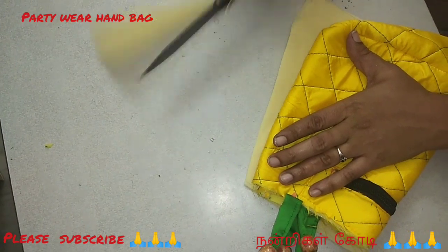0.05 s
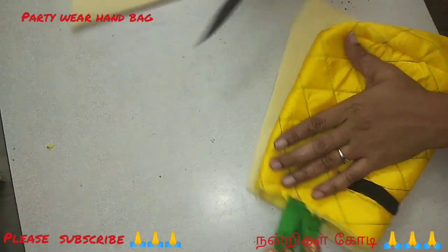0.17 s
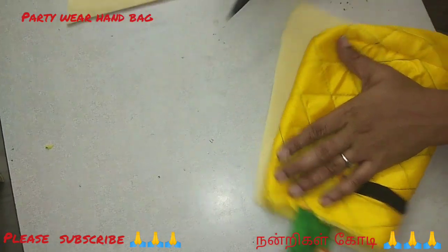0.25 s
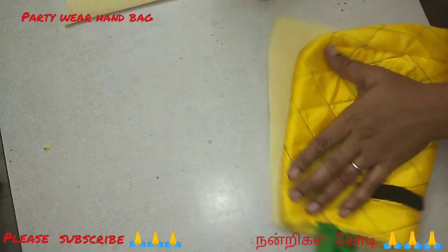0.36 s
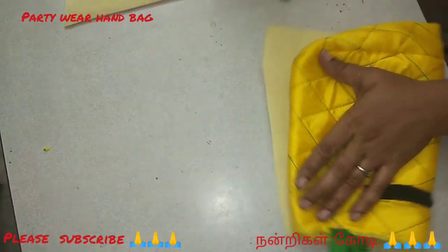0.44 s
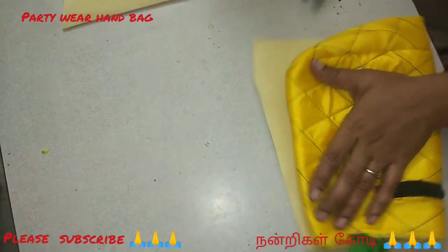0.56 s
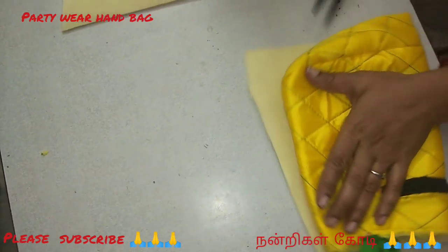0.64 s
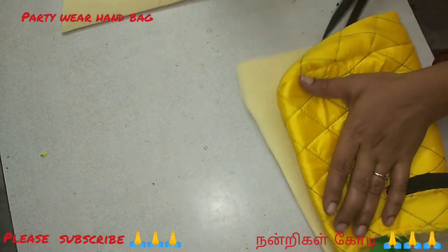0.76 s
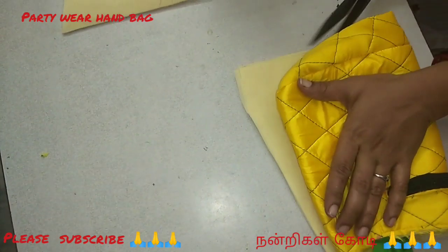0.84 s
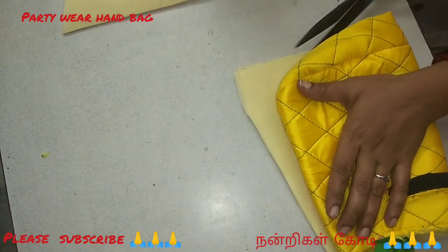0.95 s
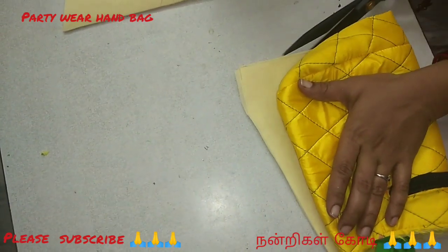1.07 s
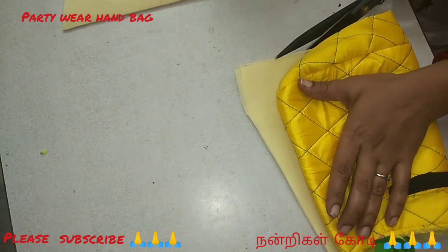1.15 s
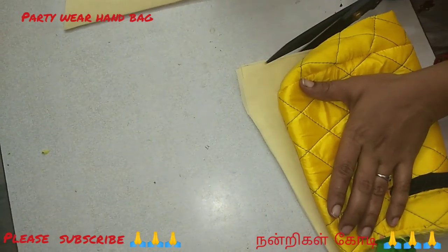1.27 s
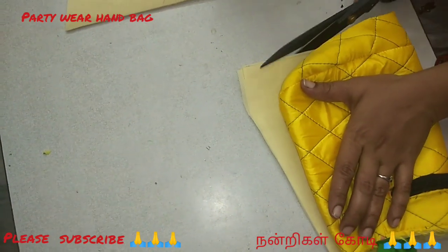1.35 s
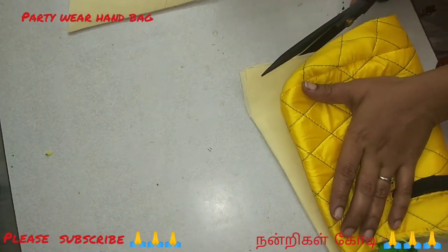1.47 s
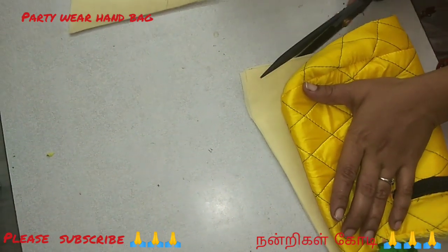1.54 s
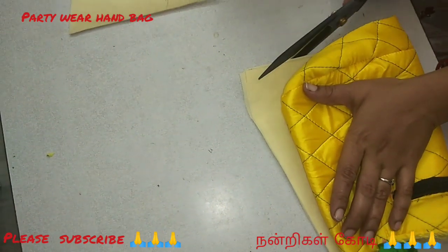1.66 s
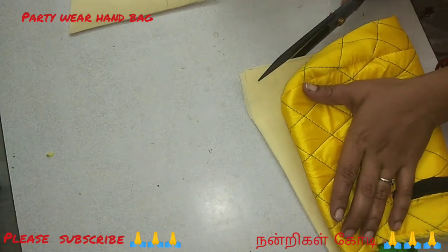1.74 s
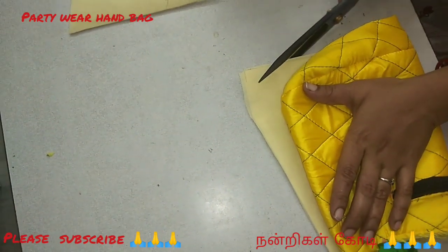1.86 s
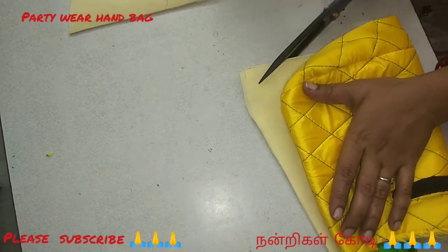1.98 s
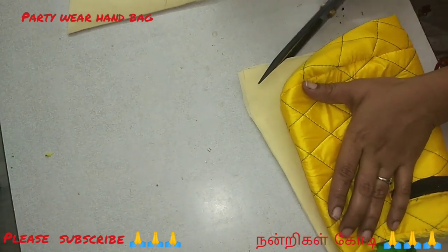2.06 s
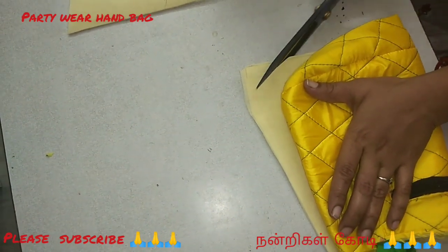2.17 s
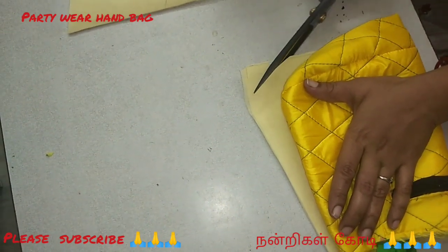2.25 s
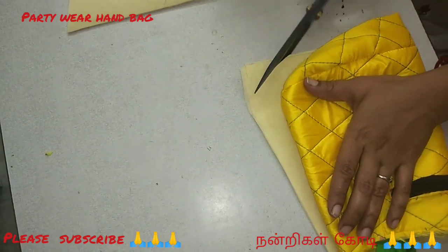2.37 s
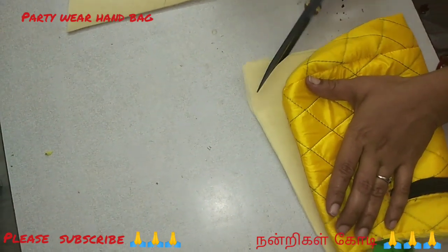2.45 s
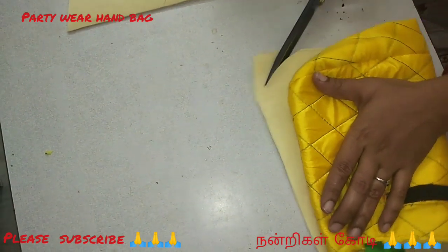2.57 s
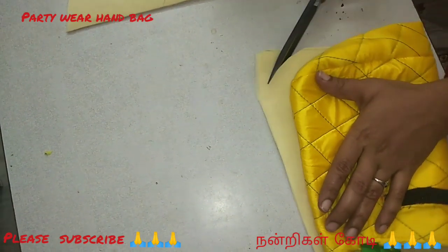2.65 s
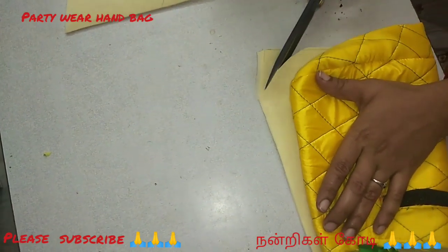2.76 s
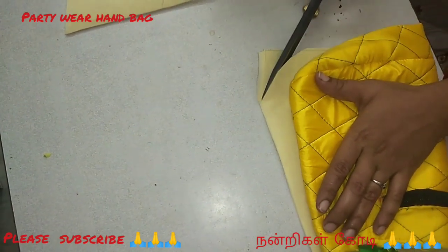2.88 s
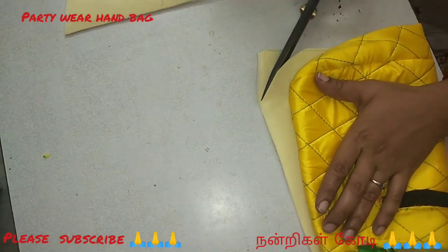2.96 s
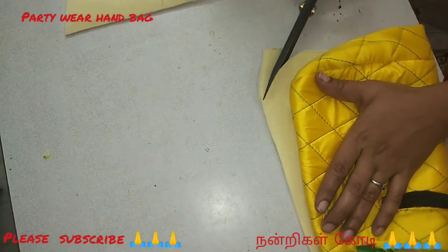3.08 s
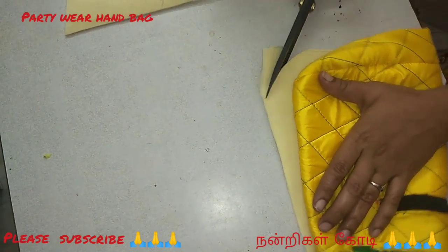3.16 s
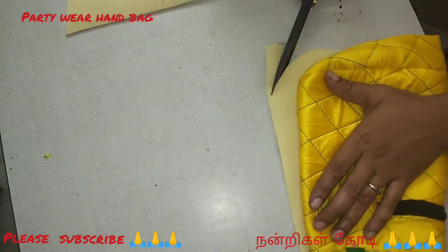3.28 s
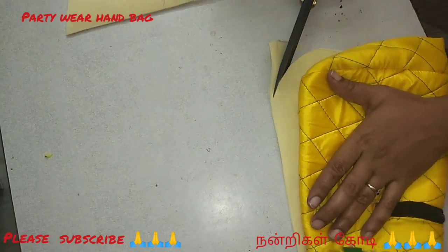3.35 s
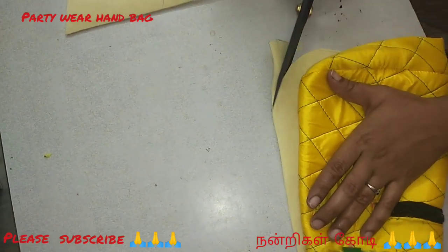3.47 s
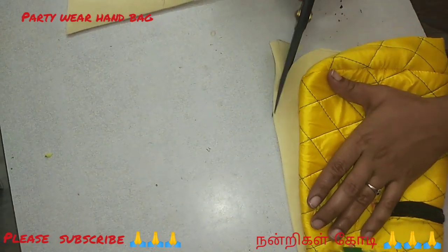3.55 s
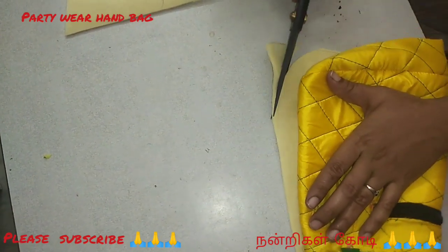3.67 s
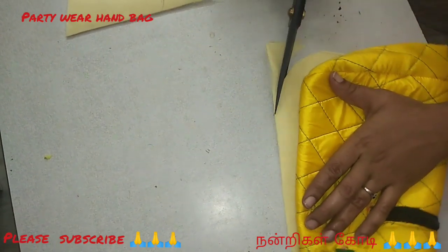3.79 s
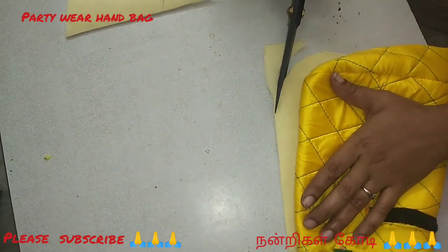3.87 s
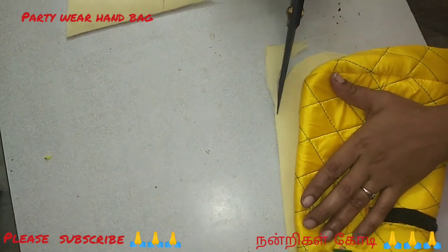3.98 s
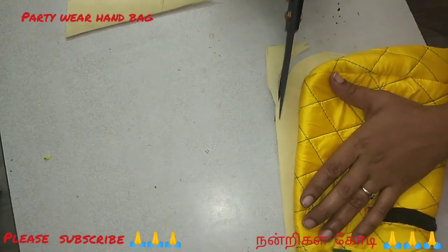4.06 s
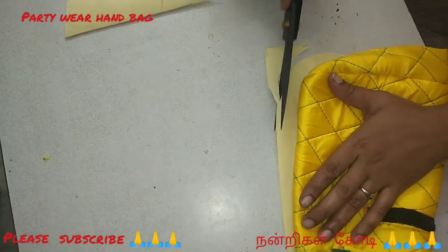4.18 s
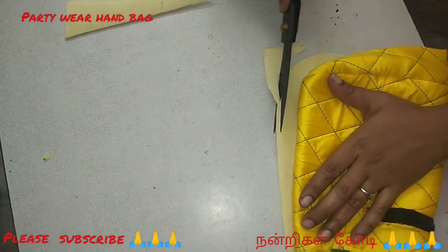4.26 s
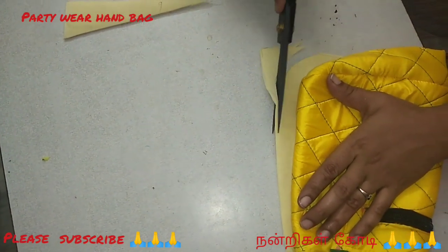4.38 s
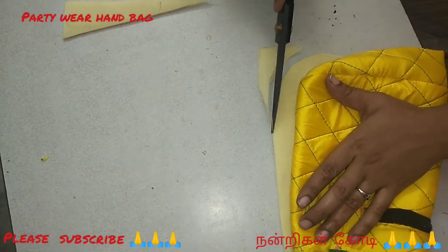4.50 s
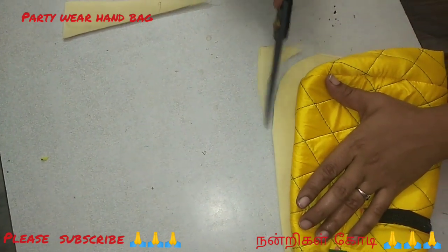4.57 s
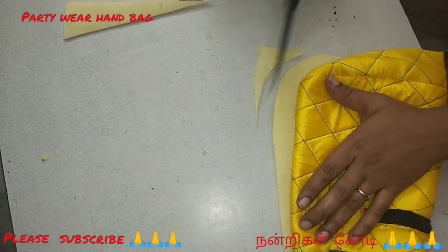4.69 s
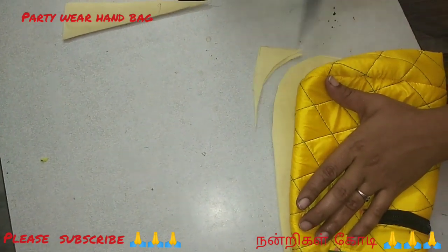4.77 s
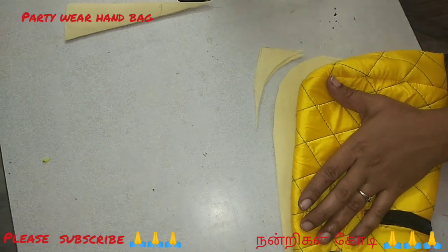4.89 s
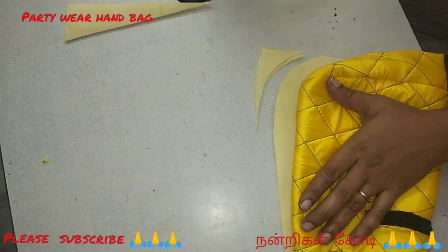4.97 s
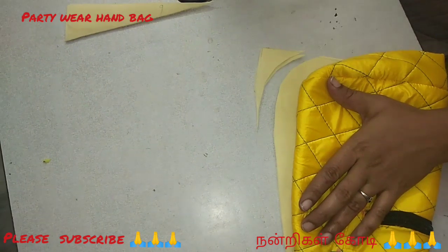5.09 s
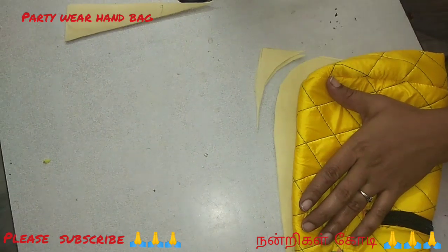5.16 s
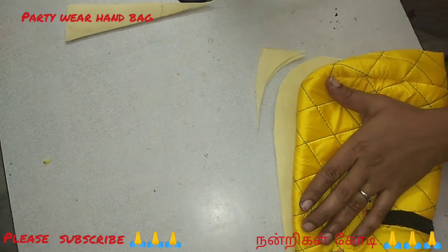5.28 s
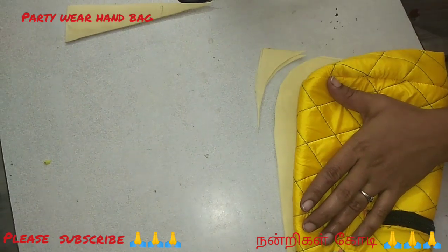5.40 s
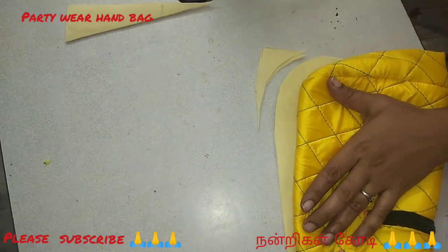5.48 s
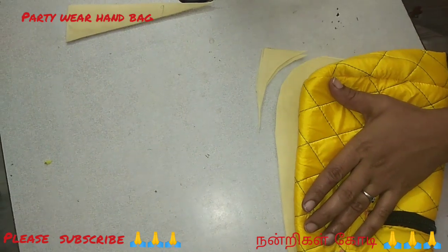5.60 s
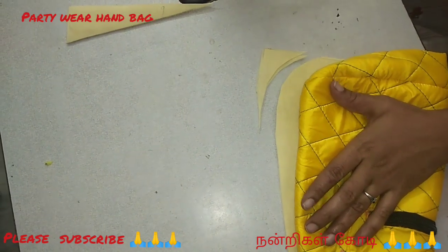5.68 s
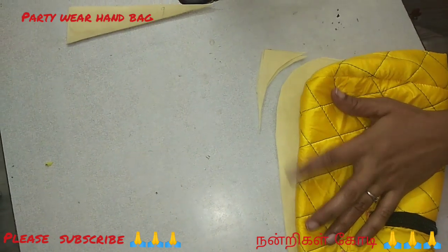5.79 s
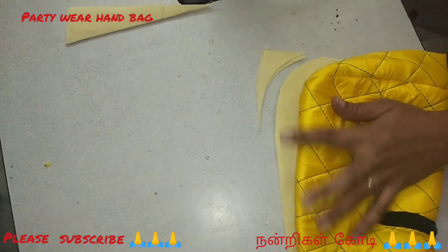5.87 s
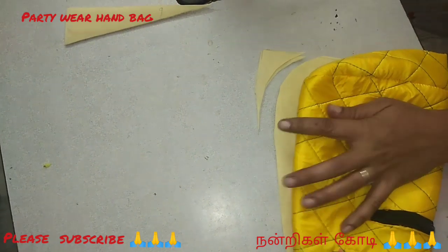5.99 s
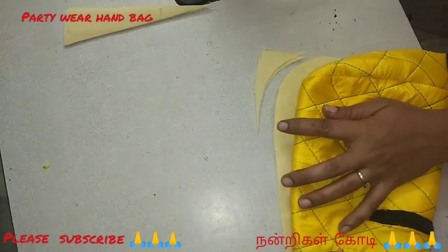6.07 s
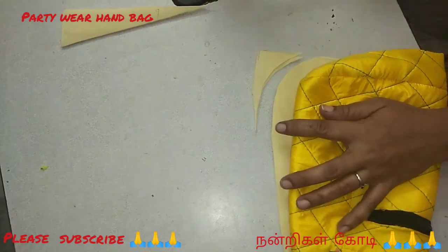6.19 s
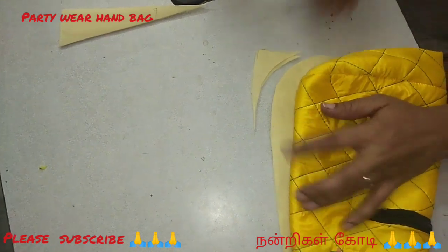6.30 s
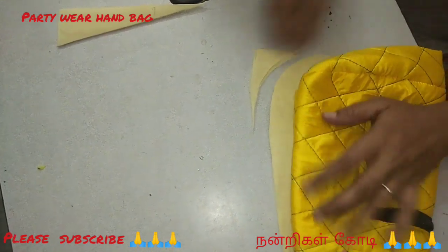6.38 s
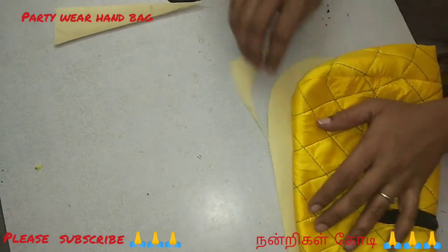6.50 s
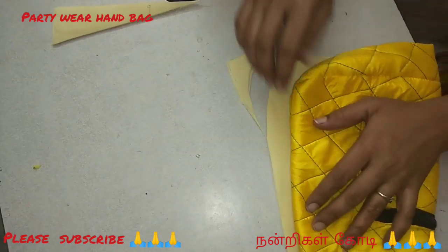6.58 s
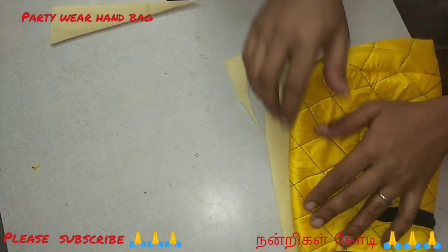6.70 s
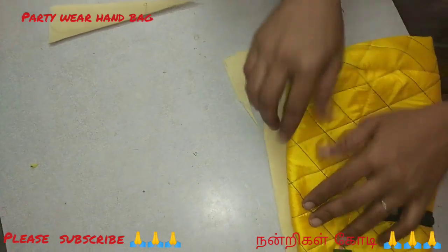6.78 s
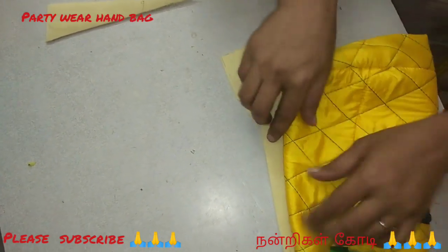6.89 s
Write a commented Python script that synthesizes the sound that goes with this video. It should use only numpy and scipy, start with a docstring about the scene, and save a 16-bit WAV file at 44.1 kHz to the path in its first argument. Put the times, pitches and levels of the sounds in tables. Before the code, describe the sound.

Close mono pickup in a small room with dull air and a faint wavering hum. Handles tap and steel scrapes on a hard table while cloth brushes softly. Heavy scissors then rasp through fabric in spaced strokes, the last ending in a metallic clack. After a pause they are laid down with a quick judder, taps and a hard knock, followed by cloth rustle and a crinkling offcut.

```python
"""A small room with a hard table, heard in mono over dull room air and a wavering hum.
First handles tap and steel slides; cloth is brushed, the table is knocked and a hand settles softly.
Large tailor's scissors then rasp through folded cloth in five strokes and clack shut on the last.
They are laid down with a judder, taps and a squeak; hands brush the cloth and the offcut crinkles.
Random snaps and single blows ring steel, cloth and table; near walls and a short tail answer."""
import sys
import numpy as np
from scipy import signal
from scipy.fft import rfft, irfft
from scipy.io import wavfile

SR = 44100
rng = np.random.default_rng(int(sys.argv[2]) if len(sys.argv) > 2 else 0)


def waveform_to_disk(signal):
    """Save audio, clipped to [-1, 1], as 16-bit WAV at the path in sys.argv[1]."""
    frames = np.transpose(np.atleast_2d(signal))
    scaled = np.clip(frames, -1, 1) * 32767
    samples = np.round(scaled).astype(np.int16)
    wavfile.write(sys.argv[1], SR, samples)


N = 306054
TIME = np.arange(N) / SR  # seconds

# Levels in the tables are relative: layer trims and the room come on top. Spectra and modes only
# set a balance. swell_db is the rise from the start of a move to its end.

# room air, spectrum: pitch_hz, level_db per Hz
AIR_SPECTRUM = [(15, -65), (25, -33), (53, -13.5), (75, -4.5), (101, -14), (140, -4), (188, -6.5),
                (215, -7.5), (378, -8), (782, -20), (895, -15), (1170, -14.5), (4870, -36.5), (8580, -43.5),
                (15500, -49)]
# steady hum in the room: pitch_hz, level_db (rms)
HUM_TONES = [(64.6, -79), (140.0, -66.5), (376.8, -82), (920.5, -79)]
# how long the room rings: pitch_hz, t60_s
ROOM_DECAY = [(150, 0.5), (500, 0.4), (1500, 0.4), (4000, 0.32), (12000, 0.2)]
# cloth brushed over the table: start_s, length_s, swish_db, fibre_hiss_db, swell_db
CLOTH_BRUSHES = [(0.24, 0.29, -55.5, -68, 0.5), (1.0, 0.46, -66.5, -76.5, -11),
                 (1.42, 0.38, -66.5, -95, -3), (2.04, 0.29, -64.5, -83, 0), (2.61, 0.3, -62.5, -77.5, -7),
                 (3.315, 0.07, -55.5, -70.5, -3), (5.9, 0.5, -61.5, -71.5, -21), (6.32, 0.17, -66, -61, 4),
                 (6.385, 0.051, -50, -65, 2), (6.52, 0.2, -68, -71.5, 3), (6.7, 0.11, -65, -63.5, 7),
                 (6.83, 0.15, -55.5, -50.5, 19)]
# brushed cloth, spectrum: pitch_hz, level_db per Hz
CLOTH_SPECTRUM = [(290, -42), (500, -4), (561, 6.5), (716, -5), (1310, -0.5), (1560, 0.5), (2760, -6),
                  (2970, -10.5), (5430, -28.5), (6740, -26), (8360, -21), (12900, -37), (15500, -27)]
# the hand settles on the padded cloth: start_s, level_db
HAND_PRESSES = [(1.072, -43.5), (1.083, -45)]
# the table's soft, low answer, modes: pitch_hz, width_hz, level_db
PADDED_MODES = [(151, 37, -1.5), (172.5, 19, -1.5), (285, 24, -6)]
# the stiff offcut crinkles under the fingers: start_s, length_s, level_db, swell_db
OFFCUT_CRINKLES = [(6.392, 0.051, -49.5, -12), (6.541, 0.0097, -57.5, -7)]
# offcut, modes: pitch_hz, width_hz, level_db
OFFCUT_MODES = [(2230, 220, 1), (2800, 300, 0), (3320, 360, -6.5), (5000, 900, -13.5)]
# steel slides over the table top: start_s, length_s, body_db, edge_db, swell_db
STEEL_SLIDES = [(0.0, 0.016, -33, -39, -3), (0.553, 0.26, -47.5, -53, 2), (0.868, 0.13, -54, -55.5, -2)]
# steel ringing against the table, modes: pitch_hz, width_hz, level_db
STEEL_MODES = [(270, 95, -7), (647, 86, -8), (1176, 176, -12), (1441, 32, 4), (1750, 93, -11),
               (2050, 120, -8), (2450, 77, -14.5), (2837, 77, -6.5), (3640, 53, -12), (4620, 130, -6.5),
               (5880, 86, -13), (7200, 150, -10), (8000, 68, -5.5), (8600, 190, -7), (9820, 270, -7),
               (11600, 140, -15)]
# a handle squeaks as it skids on the table: start_s, length_s, level_db, swell_db
HANDLE_SKIDS = [(5.797, 0.05, -42, -4)]
# skidding handle, modes: pitch_hz, width_hz, level_db
SQUEAK_MODES = [(2470, 49, 2), (2780, 68, -6), (4500, 130, -15)]
# scissors and fingers knock on the table: start_s, thud_db, ring_db, tick_db, tick_hz
TABLE_KNOCKS = [(0.5515, -37.5, -40.5, -48.5, 6150), (0.85, -52.5, -58, -57, 3500),
                (1.565, -54.5, -78, -76, 9000), (3.329, -82, -60, -64, 4000),
                (5.893, -29, -22.5, -38.5, 3860), (6.393, -51, -53, -57, 4000),
                (6.403, -71, -55, -56, 3500), (6.448, -59, -55, -58, 4500), (6.541, -62, -47, -60, 3500)]
# table top, modes: pitch_hz, width_hz, level_db
TABLE_MODES = [(169.7, 9.2, 1.5), (241, 28, -9.5), (314, 16, -1.5), (397, 60, -6), (590, 120, -5),
               (707, 123, -3.5), (1002, 83, 3), (1176, 29, 2), (1326, 90, 3), (1810, 130, 2.5),
               (2230, 196, 3), (2420, 156, 3), (2770, 160, -2), (3270, 330, -28), (4000, 1000, -23),
               (4600, 66, -9), (5500, 140, -40), (6500, 540, -15.5), (8500, 1000, -10.5), (10900, 740, -31)]
# the handles tap down: start_s, thud_db, ring_db, tick_db, tick_hz
HANDLE_TAPS = [(0.015, -39, -36, -66, 4680), (0.0315, -46, -39, -57, 5500), (5.718, -33, -35, -43, 9700),
               (5.756, -34, -34, -45.5, 7850), (5.7977, -35.5, -35.5, -50, 4200),
               (5.81, -41, -35, -62, 4200), (5.8465, -35, -39, -58, 5000)]
# the handles judder as they are lowered: start_s, length_s, body_db, edge_db, swell_db
HANDLE_JUDDER = [(5.717, 0.138, -38, -60.5, 3.5)]
# handles against the table, modes: pitch_hz, width_hz, level_db
HANDLE_MODES = [(163, 32, -5.5), (317, 21.4, 5), (607, 26, 0.5), (826, 99, -0.5), (1062, 71, -1),
                (1370, 65, -8), (1606, 136, 0), (1864, 99, -1.5), (2497, 97, -2), (2706, 85, -6),
                (3180, 180, -38), (4600, 80, -17.5), (6400, 270, -21), (8770, 870, -11), (11000, 580, -18),
                (14600, 2000, -32)]
# the blades meet their stop: start_s, thud_db, ring_db, tick_db, tick_hz
BLADE_CLACKS = [(4.6182, -29.5, -28, -42.5, 8200)]
# closed scissors, modes: pitch_hz, width_hz, level_db
SHUT_MODES = [(294, 21, 2), (402, 47, -0.5), (510, 170, -3.5), (880, 24, -39), (1126, 49, 2),
              (1460, 39, 9.5), (1674, 45, 2.5), (2500, 92, -6), (3350, 230, -17), (5000, 240, -16),
              (5950, 400, -27), (7600, 95, -19), (8200, 910, -17.5), (10300, 650, -46), (14500, 1200, -22)]
# the blades close through the cloth, or part faintly: start_s, length_s, body_db, edge_db, swell_db
BLADE_STROKES = [(1.862, 0.16, -49, -60, 6.5), (2.452, 0.15, -47, -60.5, 2.5), (3.094, 0.16, -47, -57, 9),
                 (3.772, 0.15, -48.5, -59, 4), (4.03, 0.088, -57.5, -79, -10),
                 (4.5, 0.11, -49.5, -58.5, 22)]
# blades biting cloth, modes: pitch_hz, width_hz, level_db
BLADE_MODES = [(414, 170, -2), (845, 220, -8.5), (1196, 66, 2.5), (1463, 85, -3.5), (1790, 46, -5),
               (2410, 110, -11.5), (2637, 53, -11.5), (3680, 140, -14.5), (4726, 310, -14.5),
               (5200, 65, -19), (6560, 360, -26), (8450, 200, -9), (8900, 120, -6.5), (9380, 430, -15),
               (9260, 86, -6), (10300, 510, -16.5), (11200, 410, -21.5), (12800, 1500, -27),
               (14700, 1200, -22)]


def from_db(db):
    """Turn decibels into gain."""
    return 10 ** (np.asarray(db) / 20)


def rms_one(x):
    """Scale to unit rms."""
    return x / np.sqrt(np.mean(x ** 2) + 1e-20)


def at_hz(points, hz):
    """Read a table along log frequency."""
    pitch_hz, value = np.transpose(points)
    return np.interp(np.log(hz + 1e-3), np.log(pitch_hz), value)


def band(x, hz, kind, order=2):
    """Butterworth filter."""
    sos = signal.butter(order, hz, kind, fs=SR, output="sos")
    return signal.sosfilt(sos, x + 1e-18)


def colour(x, spectrum):
    """Give a steady sound a smooth spectrum at unit rms."""
    gain = from_db(at_hz(spectrum, np.fft.rfftfreq(N, 1 / SR)))
    return rms_one(irfft(rfft(x) * gain, N))


def drift(rate):
    """Slow random wander through normal knots of spread 1, rate of them per second."""
    knots = rng.standard_normal(N // 20)
    return np.interp(TIME * rate, np.arange(len(knots)), knots)


def resonate(x, modes):
    """Ring parallel two-pole resonances of alternating sign."""
    out = 0
    for k, (hz, width, db) in enumerate(modes):
        r = np.exp(-np.pi * width / SR)
        poles = [1, -2 * r * np.cos(2 * np.pi * hz / SR), r * r]
        ring = signal.lfilter([1, 0, -1], poles, x + 1e-18)
        out = out + (-1) ** k * from_db(db) * (1 - r * r) / 2 * ring
    return out


def grains(per_s, spread_db, clump_db, clump_rate):
    """Tiny snaps of uneven size and random sign that come in clumps."""
    sizes = from_db(spread_db * np.minimum(rng.exponential(1, N), 4))
    signs = rng.choice([-1, 1], N)
    happens = rng.random(N) < per_s / SR
    return rms_one(sizes * signs * happens * from_db(clump_db * drift(clump_rate)))


def moves(rows, attack_s, release_s, arch_db):
    """Gain of hand movements: each sets in, swells, arches in mid-move and dies away."""
    out = 0
    for start, length, db, swell_db in rows:
        t = TIME - start
        travel = np.clip(t / length, 0, 1)
        force = from_db(db + swell_db * (travel - .5) + arch_db * (np.sin(np.pi * travel) - .5))
        onset = np.clip(t / attack_s, 0, 1)
        out = out + force * onset * np.exp(-np.maximum(t - length, 0) / release_s)
    return out


def low_and_high(rows):
    """Split movements into those of the low layer and those of the treble."""
    lows = [(s, length, low, swell) for s, length, low, _, swell in rows]
    highs = [(s, length, high, swell) for s, length, _, high, swell in rows]
    return lows, highs


def friction(body, edge, snaps, modes, direct_db, edge_hz, wander_db, catch_db):
    """Snaps drive a body: pressure sets its low ring, the sharpness of contact its treble."""
    edge = edge * from_db(catch_db * drift(75))  # the edge catches and frees itself
    bare = from_db(direct_db) * band(band(snaps, 340, "high"), 10800, "low")
    rings = 0
    for k, mode in enumerate(modes):
        # the contact point travels over nodes and bellies, so each mode swells and fades
        wander = from_db(wander_db * drift(16))
        rings = rings + (-1) ** k * resonate(snaps, [mode]) * wander
    ringing = rms_one(rings) + bare
    low = rms_one(band(ringing, edge_hz, "low", order=4))
    high = rms_one(band(ringing, edge_hz, "high", order=4))
    return body * low + edge * high


def blows(rows, modes, crack_db, crack_s, crack_hz, thud_hz, tick_hz):
    """Each blow rings a body; its hardness shares the energy among thud, ring and tick."""
    t = TIME[:SR // 5]
    out = np.zeros(N + len(t))
    ring = rms_one(resonate(1. * (t == 0), modes))
    for s, thud_db, ring_db, tick_db, contact_hz in rows:
        grit = rng.standard_normal(len(t)) * t * np.exp(-t / crack_s)  # rough faces grind for a moment
        crack = from_db(crack_db) * rms_one(band(band(grit, 560, "high"), crack_hz, "low"))
        thud = from_db(thud_db) * rms_one(band(ring, thud_hz, "low", order=4))
        middle = from_db(ring_db) * rms_one(band(ring + crack, [thud_hz, tick_hz], "band", order=3))
        treble = band(rms_one(resonate(grit, modes)) + crack, tick_hz, "high", order=6)
        contact_band = contact_hz * np.sqrt([.5, 2])  # a sharper corner ticks higher
        tick = from_db(tick_db) * rms_one(band(treble, contact_band, "band", order=1))
        at = int(max(s, 0) * SR)
        out[at:at + len(t)] += thud + middle + tick
    return out[:N]


def background():
    """Dull room air is shaped noise; the hum is a few tones of slightly wavering phase."""
    air = from_db(-57.5) * colour(rng.standard_normal(N), AIR_SPECTRUM)
    hum = 0
    for hz, db in HUM_TONES:
        phase = 2 * np.pi * hz * TIME + 0.2 * drift(7.1)
        hum = hum + from_db(db) * np.sqrt(2) * np.sin(phase)
    return air + hum


def room(x, early_db, early_s, tail_db):
    """Dense early reflections from near walls, then a tail whose treble dies first."""
    t = TIME[:SR * 3 // 4]
    edges_hz = np.geomspace(90, 16000, 12)
    white = rng.standard_normal((2, len(t))) / np.sqrt(SR)
    early = from_db(early_db) / np.sqrt(early_s) * np.exp(-(t / early_s) ** 6)
    after_gap = t > .003  # seconds before the first reflection
    response = 0
    for k, (low, high) in enumerate(zip(edges_hz, edges_hz[1:])):
        t60 = at_hz(ROOM_DECAY, np.sqrt(low * high))
        tail = from_db(tail_db) * np.sqrt(2 * np.log(1000) / t60) * np.exp(-np.log(1000) * t / t60)
        echoes = white[k % 2] * np.hypot(early, tail) * after_gap
        response = response + band(echoes, [low, high], "band")
    return signal.fftconvolve(x, response)[:N]


def brushing():
    """Countless fibres catch and let go as the cloth moves."""
    pushes, rubs = low_and_high(CLOTH_BRUSHES)
    swish = moves(pushes, attack_s=0.03, release_s=0.064, arch_db=1.0)
    hiss = moves(rubs, attack_s=0.037, release_s=0.035, arch_db=-1.0)
    snaps = grains(per_s=7100, spread_db=2.5, clump_db=1.5, clump_rate=72)
    fibres = colour(snaps, CLOTH_SPECTRUM)
    low = swish * rms_one(band(fibres, 5500, "low", order=4))
    high = hiss * rms_one(band(fibres, 4840, "high", order=4))
    return from_db(-2.5) * low + from_db(-0.5) * high


def pressing():
    """A soft push reaches only the lowest modes of the table."""
    pushes = np.zeros(N)
    for s, db in HAND_PRESSES:
        pushes[int(s * SR)] = from_db(db)
    thump = resonate(band(pushes, 340, "low"), PADDED_MODES)
    return thump / np.abs(thump).max() * pushes.max() * from_db(2.5)


def crinkling():
    """Small creases snap in the offcut as it is picked up."""
    creases = grains(per_s=1500, spread_db=6.0, clump_db=-2.5, clump_rate=150)
    force = moves(OFFCUT_CRINKLES, attack_s=0.0016, release_s=0.0095, arch_db=-1.2)
    return force * rms_one(resonate(creases, OFFCUT_MODES))


def skidding():
    """A handle sticks and slips quickly on the table top."""
    slips = grains(per_s=2500, spread_db=0.5, clump_db=6.0, clump_rate=100)
    force = moves(HANDLE_SKIDS, attack_s=0.0016, release_s=0.0041, arch_db=-13.0)
    return force * rms_one(resonate(slips, SQUEAK_MODES))


def sliding():
    """Fine stick and slip makes the steel sing on the table top."""
    pressure, bite = low_and_high(STEEL_SLIDES)
    body = moves(pressure, attack_s=0.02, release_s=0.036, arch_db=1.0)
    edge = moves(bite, attack_s=0.02, release_s=0.012, arch_db=-0.5)
    slips = grains(per_s=5000, spread_db=2.5, clump_db=0.95, clump_rate=39)
    return from_db(-2.0) * friction(body, edge, slips, STEEL_MODES, direct_db=-4, edge_hz=2850,
                                    wander_db=4.0, catch_db=-2.5)


def juddering():
    """Small bumps shake the handles as they are lowered to the table."""
    pressure, bite = low_and_high(HANDLE_JUDDER)
    body = moves(pressure, attack_s=0.0031, release_s=0.01, arch_db=-5.5)
    edge = moves(bite, attack_s=0.0031, release_s=0.01, arch_db=-5.5)
    bumps = grains(per_s=2500, spread_db=3.2, clump_db=2.0, clump_rate=140)
    return from_db(-3.0) * friction(body, edge, bumps, HANDLE_MODES, direct_db=-18, edge_hz=3200,
                                    wander_db=4.0, catch_db=-9.0)


def clatter():
    """Hard blows ring what they strike: table knocks, handle taps and the blades clacking shut."""
    knocks = blows(TABLE_KNOCKS, TABLE_MODES, crack_db=-15.5, crack_s=0.001, crack_hz=5500,
                   thud_hz=567, tick_hz=2860)
    taps = blows(HANDLE_TAPS, HANDLE_MODES, crack_db=-5.5, crack_s=0.00067, crack_hz=7000,
                 thud_hz=476, tick_hz=3500)
    clacks = blows(BLADE_CLACKS, SHUT_MODES, crack_db=-12.0, crack_s=0.0016, crack_hz=6960,
                   thud_hz=770, tick_hz=3620)
    return from_db(-12) * knocks + from_db(-14.5) * taps + from_db(-11) * clacks


def cutting():
    """Threads snap: the edge bites at once, pressure arches, and the edge rises faintly at the end."""
    pressure, bite = low_and_high(BLADE_STROKES)
    # a faint extra bite at the very end of each stroke
    extra_s, extra_db = 0.0072, -7  # its length, and its level setting relative to the edge
    extras = [(s + length - extra_s, extra_s, db + swell_db / 2 + extra_db, 0)
              for s, length, db, swell_db in bite]
    body = moves(pressure, attack_s=0.017, release_s=0.037, arch_db=3.5)
    edge = moves(bite, attack_s=0.0073, release_s=0.0039, arch_db=-4.0)
    # the slow attack is cut short, so the extra bite stays below its setting
    extra_bite = moves(extras, attack_s=0.019, release_s=0.0025, arch_db=-13.0)
    threads = grains(per_s=3000, spread_db=3.0, clump_db=1.3, clump_rate=220)
    return from_db(-2.5) * friction(body, edge + extra_bite, threads, BLADE_MODES, direct_db=-12,
                                    edge_hz=3360, wander_db=3.0, catch_db=4.0)


def scene():
    """Everything happens on one table; the soft rasps carry less into the room than the knocks."""
    rasps = brushing() + crinkling() + sliding() + cutting()
    knocks = pressing() + skidding() + juddering() + clatter()
    into_room = knocks + from_db(-6.5) * rasps
    walls = room(into_room, early_db=-5.0, early_s=0.035, tail_db=-3.0)
    mono = background() + walls + rasps + knocks
    return np.array([mono, mono])


def record(dry):
    """A steep elliptic low-pass cuts the top above 15.5 kHz."""
    sos = signal.ellip(12, .1, 80, 15500, fs=SR, output="sos")  # 0.1 dB ripple, 80 dB stop
    return signal.sosfilt(sos, dry)


dry = scene()
out = record(dry)
waveform_to_disk(out)
```